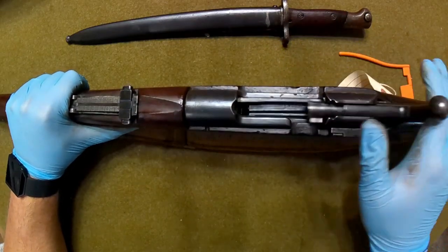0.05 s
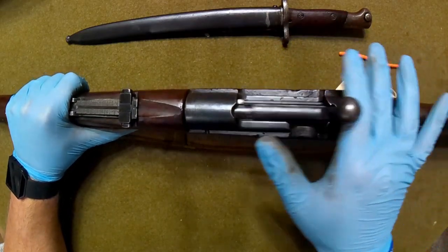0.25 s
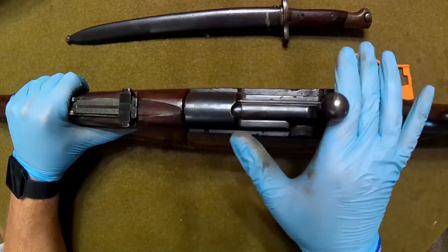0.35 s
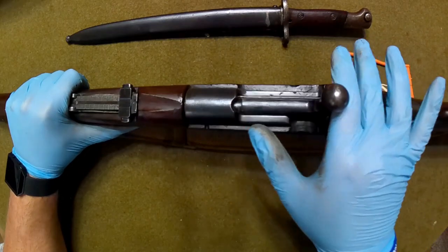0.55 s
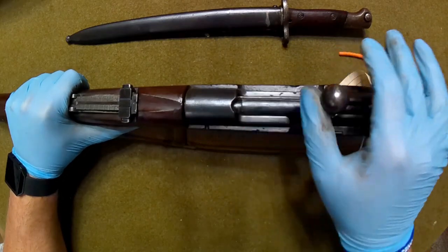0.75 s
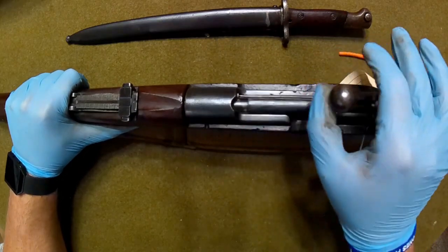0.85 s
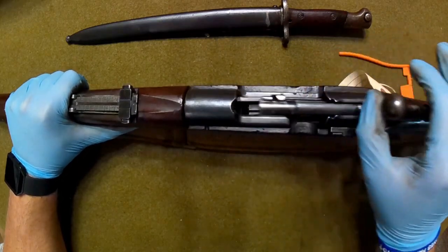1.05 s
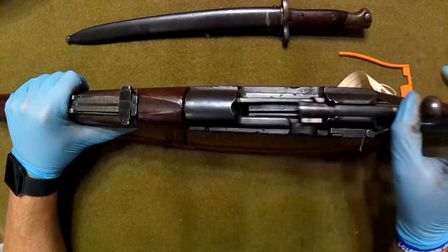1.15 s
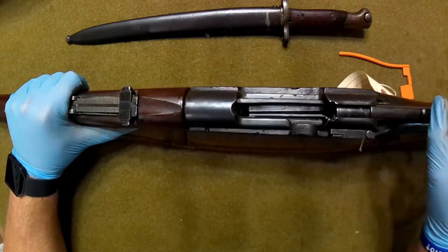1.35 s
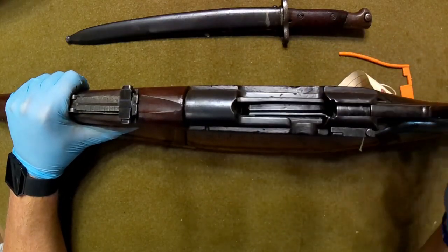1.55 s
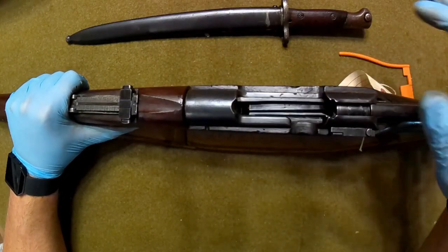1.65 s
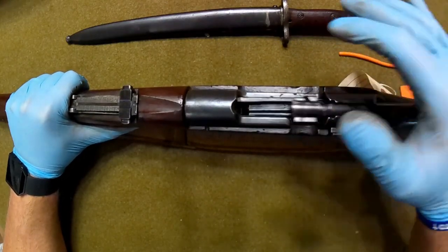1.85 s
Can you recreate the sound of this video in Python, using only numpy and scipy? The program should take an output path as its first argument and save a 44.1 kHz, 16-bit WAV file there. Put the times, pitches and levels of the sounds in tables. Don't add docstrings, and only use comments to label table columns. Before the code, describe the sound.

A rifle bolt is pushed home, drawn back to its stop, then released with soft clicks.

```python
import sys
import numpy as np
from scipy import signal
from scipy.fft import rfft, irfft
from scipy.io import wavfile
from scipy.ndimage import uniform_filter1d

SR = 44100
rng = np.random.default_rng(int(sys.argv[2]) if len(sys.argv) > 2 else 0)


def file_out(sig):
    cols = np.atleast_2d(sig).T
    lim = np.clip(cols, -1, 1)
    pcm = np.round(lim * 32767).astype(np.int16)
    wavfile.write(sys.argv[1], SR, pcm)


def invert_db(x):
    u = np.asarray(x, float) / 20
    return 10 ** u


N = 83790

# time in seconds, level in dB.
SCRAPE = [(0, -71.5), (.2, -70), (.26, -54.5), (.45, -73), (0.741, -86), (.78, -76.5), (.87, -61),
          (.95, -68.5), (1.1, -67.5), (1.17, -67.5), (1.24, -60.5), (1.4, -92), (1.67, -79), (1.71, -74),
          (1.76, -78), (1.9, -62)]
RISE_S = 0.00035


def unit(x):
    return x / np.sqrt(np.mean(x ** 2))


def band(x, hz, width):
    return signal.lfilter(*signal.iirpeak(hz, hz / width, fs=SR), x)


def steep_band(x, hz, width):
    return band(band(x, hz, width), hz, width)


def decay(t, t60):
    return np.exp(-np.log(1000) * t / t60)


def add(out, s, x):
    i = int(s * SR)
    out[i:i + len(x)] += x[:N - i]


def walk(rate):
    k = int(SR / rate)
    return unit(uniform_filter1d(uniform_filter1d(rng.standard_normal(N), k), k))


def ring(modes, luck, force, size=6000):
    detune, scatter_db, onset_cycles = 0.006, 1.8, 1.2
    hz, db, t60 = np.array(modes).T[:, :, None]
    t = np.arange(size) / SR
    hz = hz * (1 + detune * luck[:len(modes), None])
    db = db + scatter_db * luck[-len(modes):, None]
    onset = 1 - np.exp(-(t * hz / onset_cycles) ** 2)
    tones = np.sin(2 * np.pi * hz * t) * onset * decay(t, t60)
    x = signal.fftconvolve(tones, force[None], axes=1)
    return (invert_db(db) * x / np.abs(x).max(axis=1, keepdims=True)).sum(axis=0)


def air_and_hum():
    # frequency in Hz, level in dB per Hz.
    air_colour = [(12, -17), (20, -5), (27, -20), (66, -19.5), (106, -11.5), (333, -15.5), (767, -26),
                  (1380, -32.5), (15500, -45.5)]
    air_db, hum_hz, hum_width_hz, hum_db = -59, 69, 14, -62.5
    hz = np.maximum(np.arange(N // 2 + 1) * SR / N, 1)
    knee_hz, knee_db = np.array(air_colour).T
    colour = invert_db(np.interp(np.log(hz), np.log(knee_hz), knee_db)) * (hz > 8)
    air = unit(irfft(rfft(rng.standard_normal(N)) * colour, N))
    hum = unit(steep_band(rng.standard_normal(N), hum_hz, hum_width_hz))
    return invert_db(air_db) * air + invert_db(hum_db) * hum


def room(x):
    # frequency in Hz, t60 in seconds, level in dB.
    tail_bands = [(355, 0.21, -5.5), (679, 0.2, -7.5), (1310, 0.2, -5.5), (2700, 0.24, -9.5),
                  (5500, .22, -14), (11000, .16, -18), (7400, .18, -10)]
    onset_s = 0.0041
    t = np.arange(20000) / SR
    tail = np.zeros(len(t))
    for hz, t60, db in tail_bands:
        fade = decay(t, t60) * np.minimum(t / onset_s, 1) ** 2
        noise = steep_band(rng.standard_normal(len(t)), hz, 0.76 * hz)
        tail += 2 * invert_db(db) * noise * fade / np.sqrt(np.sum(fade ** 2))
    return signal.fftconvolve(x, tail)[:N]


def rumble():
    # frequency in Hz, width in Hz, level in dB.
    rustle = [(35, 62, -63), (234, 193, -62.5)]
    motion_db = np.interp(np.arange(N) / SR, *np.array(SCRAPE).T) + 70
    low = sum(invert_db(db) * unit(steep_band(rng.standard_normal(N), hz, width)) for hz, width, db in rustle)
    return low * invert_db(0.49 * motion_db)


def thumps():
    # start in seconds, top level in dB, box level in dB.
    table_knocks = [
        (.08, -63, -46.5),
        (0.114, -45.5, -39),
        (0.239, -44, -37),
        (.305, -34.5, -33.5),
        (0.901, -44, -46),
        (1.019, -45, -36.5),
        (1.19, -32.5, -35),
        (1.293, -29.5, -32.5),
        (1.81, -40.5, -41.5),
        (1.862, -44, -44),
    ]
    # frequency in Hz, level in dB, t60 in seconds.
    table_modes = [(138.7, -3, 0.21), (119, -20, 0.35), (208.7, -15.5, 0.11), (304, -4.5, 0.056),
                   (391.2, -2, 0.15)]
    rise_s = 0.0091
    swell = 1 - np.exp(-(np.arange(16000) / SR / rise_s) ** 2)
    out, push = np.zeros(N), np.ones(1)
    for s, top_db, box_db in table_knocks:
        luck = 0.3 * rng.standard_normal(20)
        add(out, s, invert_db(top_db) * swell * ring(table_modes[:3], luck, push, size=16000))
        add(out, s, invert_db(box_db) * swell * ring(table_modes[3:], luck, push, size=16000))
    return out


def scrape():
    # frequency in Hz, width in Hz, level in dB.
    rail_bands = [(1100, 830, 0.5), (2480, 440, -11.5), (3590, 760, -6.5), (5400, 1460, -8.5),
                  (9800, 1400, -14)]
    slips_per_s, uneven_db = 5000, 1.5
    happens = rng.random(N) < slips_per_s / SR
    slips = happens * rng.standard_normal(N) * invert_db(uneven_db * rng.standard_normal(N))
    rails = sum(invert_db(db) * unit(steep_band(slips, hz, width)) for hz, width, db in rail_bands)
    stroke_db = np.interp(np.arange(N) / SR, *np.array(SCRAPE).T)
    return rails * invert_db(stroke_db + 2.5 * walk(46))


def grit():
    # start in seconds, level in dB rms, t60 in seconds.
    grinds = [
        (.026, -60, .03),
        (.203, -56, .05),
        (.2365, -43, .11),
        (.853, -50, .1),
        (1.008, -57, .08),
        (1.185, -43, .1),
        (1.224, -51, .05),
        (1.777, -57, .04),
        (1.808, -55, .1),
        (1.86, -55, .1),
    ]
    # frequency in Hz, width in Hz, level in dB.
    grain_bands = [(2900, 2000, 0), (4000, 1500, -2), (5700, 2500, -2)]
    t, out = np.arange(6000) / SR, np.zeros(N)
    for s, db, t60 in grinds:
        grains = rng.standard_normal(6000) * invert_db(4.0 * rng.standard_normal(6000))
        colour = unit(sum(invert_db(g) * unit(steep_band(grains, hz, width)) for hz, width, g in grain_bands))
        add(out, s, invert_db(db) * colour * np.minimum(t / (2 * RISE_S), 1) * decay(t, t60))
    return out


def knocks():
    # start in seconds, frequency in Hz, peak level in dB, t60 in
    # seconds.
    part_taps = [(.1135, 985, -36, .04), (.124, 930, -42, .04), (.2037, 1930, -37.5, .02),
                 (.2035, 3890, -42, .015), (.218, 3700, -49, .008), (.237, 700, -31, .045),
                 (.238, 1160, -28, .04), (.2465, 5610, -39, .006), (.2395, 1820, -30, .045),
                 (.2535, 5600, -41, .006), (.2595, 6200, -45, .006), (.854, 2370, -34, .01),
                 (.861, 689, -34, .06), (.8618, 1330, -31, .018), (.898, 678, -41, .03),
                 (.899, 5870, -45, .006), (.8985, 1650, -40, .01), (1.008, 1300, -38, .02),
                 (1.009, 1860, -34, .025), (1.1855, 5600, -38, .007), (1.187, 850, -31, .03),
                 (1.192, 1350, -29, .015), (1.199, 5400, -43, .007), (1.2245, 5800, -43, .008),
                 (1.2245, 2000, -43, .01), (1.2682, 1200, -30, .005), (1.719, 5800, -56, .01),
                 (1.725, 1100, -43, .022), (1.7265, 2100, -49, .01), (1.7765, 1450, -42, .01),
                 (1.809, 1900, -46, .01), (1.8205, 1040, -32, .018), (1.8435, 5500, -47, .006),
                 (1.861, 900, -38, .025), (1.861, 3700, -52, .008),
                 (.3055, 1900, -22, .025), (.3035, 11000, -30, .014), (1.0085, 3620, -38, .018),
                   (1.0085, 5800, -43, .008), (1.0115, 1300, -34, .018), (1.2895, 2120, -27, .015),
                   (1.2895, 3056, -31, .015), (1.2955, 4600, -29, .008), (1.2918, 1330, -20, .025),
                   (.8545, 3590, -37, .02), (1.81, 950, -38, .03), (1.877, 1050, -40, .02),
                   (1.877, 3750, -52, .01), (.0268, 1450, -39, .008), (.0278, 3700, -50, .008),
                   (.099, 5500, -44, .006), (.1245, 3650, -52, .008), (.0765, 1100, -46, .008)]
    out = np.zeros(N)
    for s, *mode in part_taps:
        add(out, s, ring([mode], np.zeros(1), np.ones(1)))
    return out


def chatter(draw, hold_s, rattle_db=-15):
    fade_s, uneven_db, rattle_s = 0.00092, 2, 0.012
    t = np.arange(1600) / SR
    grains = draw[:1600] * invert_db(uneven_db * draw[1600:3200])
    burst = np.minimum(t / RISE_S, 1) * np.exp(-np.maximum(t - hold_s, 0) / fade_s) * grains
    hit = rfft(burst)
    hit = irfft(hit / np.abs(hit)) * np.sqrt(hold_s * SR)
    hit = hit * np.exp(-np.maximum(t - 2 * hold_s, 0) / fade_s)
    rattle = np.exp(-t / rattle_s) * np.minimum(t / hold_s, 1) * grains
    return hit + invert_db(rattle_db) * rattle


def crack(force, part):
    # frequency in Hz, width in Hz, level in dB.
    snap_bands = [
        (824, 635, -4.5),
        (1630, 1080, -2),
        (4670, 4030, -2.5),
        (9880, 7700, -5.5),
    ]
    hz, width, db = snap_bands[part]
    x = steep_band(force, hz, width)
    return invert_db(db) * x / np.sqrt(np.mean(x[:200] ** 2))


def contacts():
    # frequency in Hz, level in dB, t60 in seconds.
    stock = [(560, -9, .04), (698.4, 2.5, 0.043), (869.5, -2, 0.034), (1000, -3, 0.062)]
    receiver = [(1122, 6, 0.024), (1258, 6.5, 0.018), (1381, -13.5, 0.037), (1863, 0, 0.014),
                (1920, -10.5, 0.032), (2320, -13, .01)]
    bolt = [(3080, -15.5, 0.0098), (3644, 2, 0.011), (4260, 0, .007), (4910, -8.5, 0.0035),
            (5674, 2, 0.0062), (6270, -3.5, .008)]
    edges = [(7270, 9, 0.0052), (8300, 2, .007), (9500, -9, .005), (10380, 3.5, 0.0054)]
    # start in seconds, then edge, stock, receiver and bolt levels in dB.
    push = [(0.026, -55, -56, -50, -58), (0.0747, -68, -58, -62, -64), (0.0982, -56, -58, -60, -58),
            (0.1134, -60, -38.5, -46, -59), (0.1244, -63, -41, -50.5, -58), (0.2023, -57, -46, -45, -49),
            (0.2175, -62, -44, -51, -51), (0.2362, -36, -29, -28, -37), (0.2448, -39, -39, -35, -41),
            (0.2533, -50, -41, -35.5, -39), (0.2612, -55, -33, -38, -53)]
    pull = [(0.853, -42, -40, -42, -39), (0.8614, -54, -41, -39, -51), (0.8972, -55, -45, -47, -50),
            (1.0077, -59, -40, -37, -42), (1.0244, -65, -43, -50.5, -71), (1.1338, -67, -51, -55.5, -68),
            (1.1854, -53, -27.5, -32, -38.5), (1.1907, -50, -32.5, -31.5, -38.5),
            (1.2004, -54, -39.5, -37.5, -47.5), (1.2234, -58, -39, -49, -49),
            (1.2965, -30, -36.5, -32, -42)]
    let_go = [
        (1.4431, -45, -54, -62.5, -62.5),
        (1.7115, -57, -66, -66, -64),
        (1.7254, -62, -41.5, -50, -62),
        (1.7764, -41.5, -57, -42.5, -50),
        (1.8078, -50, -36.5, -44, -54),
        (1.8204, -63, -37.5, -48, -56),
        (1.8432, -55, -46.5, -60, -52),
        (1.8604, -60, -39, -43, -54.5),
        (1.8754, -65, -41, -45, -54.5),
    ]
    take_up = [
        (.841, -66, -50, -60, -66),
        (.998, -70, -52, -55, -62),
        (1.2695, -46, -50, -43, -54),
        (.317, -60, -30, -31, -46),
    ]
    light_db, part_trim_db, edge_trim_db = -2.5, (-4, -3.5, -2.5), -12
    out = np.zeros((2, N))
    for s, edge_db, *parts_db in [*push, *pull, *let_go, *take_up]:
        force = chatter(rng.standard_normal(3200), hold_s=0.002)
        levels = [db + light_db + trim for db, trim in zip(parts_db, part_trim_db)]
        levels.append(edge_db + edge_trim_db)
        for part, (modes, db) in enumerate(zip((stock, receiver, bolt, edges), levels)):
            add(out[0], s, invert_db(db) * ring(modes, rng.standard_normal(20), force))
            add(out[1], s, invert_db(db) * crack(force, part))
    return out


def blow(s, modes, ring_db, knock_db, crack_db, hold_s, rattle_db):
    out = np.zeros((2, N))
    force = chatter(rng.standard_normal(3200), hold_s, rattle_db)
    knock = crack(force, 0) + crack(force, 1)
    snap = crack(force, 2) + crack(force, 3)
    add(out[0], s, invert_db(ring_db) * ring(modes, np.zeros(20), force))
    add(out[1], s, invert_db(knock_db) * knock + invert_db(crack_db) * snap)
    return out


def bolt_home():
    # frequency in Hz, level in dB, t60 in seconds.
    home_modes = [(705, -2, 0.039), (1030, -1.5, 0.011), (1362, 3, 0.011), (1918, -3, 0.011),
                  (3570, -6, 0.018), (3820, -6, .018), (4640, -18, .012), (5500, -5, 0.016),
                  (6430, -8, .012), (8280, -16, 0.018), (10900, -12, 0.0095), (5900, -12, .01)]
    return blow(.3028, home_modes, ring_db=-16, knock_db=-28.5, crack_db=-26, hold_s=.0045, rattle_db=-22)


def bolt_stop():
    # frequency in Hz, level in dB, t60 in seconds.
    stop_modes = [(1000, -13.5, .015), (1270, -0.5, .02), (1760, -8, .015), (3040, -15.5, .01),
                  (3575, -10, 0.014), (4210, -6, .01), (4880, -5, .012), (5410, -4, .01), (5910, -3, .007),
                  (7400, -10, .008), (8050, -11, .01), (10900, -19, .01)]
    return blow(1.2890, stop_modes, ring_db=-14.5, knock_db=-25.5, crack_db=-21, hold_s=.0016, rattle_db=-25)


def scene():
    rifle_low_hz, mic_top_hz, above_mic_db = 380, 11400, -10.5
    ring_to_room_db, taps_to_room_db = -9, -8
    hits = contacts() + bolt_home() + bolt_stop()
    rings, snaps = signal.sosfilt(signal.butter(3, rifle_low_hz, "high", fs=SR, output="sos"), hits)
    snaps = snaps + scrape()
    taps = knocks()
    echo = room(snaps + invert_db(ring_to_room_db) * rings + invert_db(taps_to_room_db) * taps)
    rifle = rings + snaps + taps + echo
    dull = signal.sosfiltfilt(signal.butter(8, mic_top_hz, fs=SR, output="sos"), rifle)
    heard = dull + invert_db(above_mic_db) * (rifle - dull)
    return (heard + thumps() + rumble() + air_and_hum() + grit())[None]


def top_cut(x):
    return signal.sosfilt(signal.butter(12, 16330, fs=SR, output="sos"), x)


def record(dry):
    cut = signal.sosfilt(signal.ellip(8, .2, 60, 15400, fs=SR, output="sos"), dry)
    offset = -0.0057
    return top_cut(cut + offset)


dry = scene()
out = record(dry)
file_out(out)
```